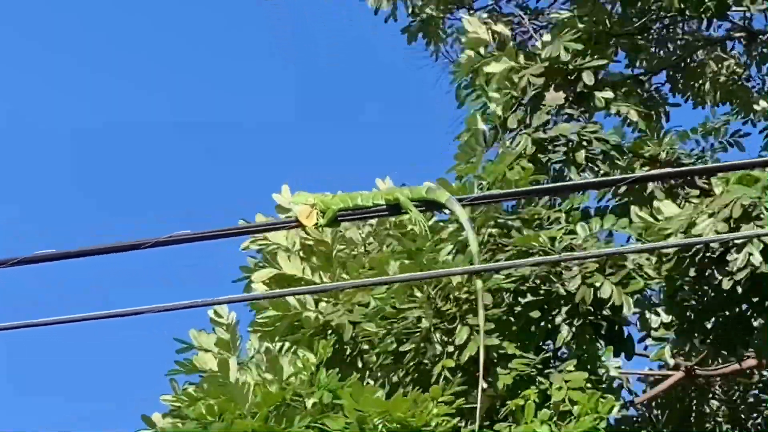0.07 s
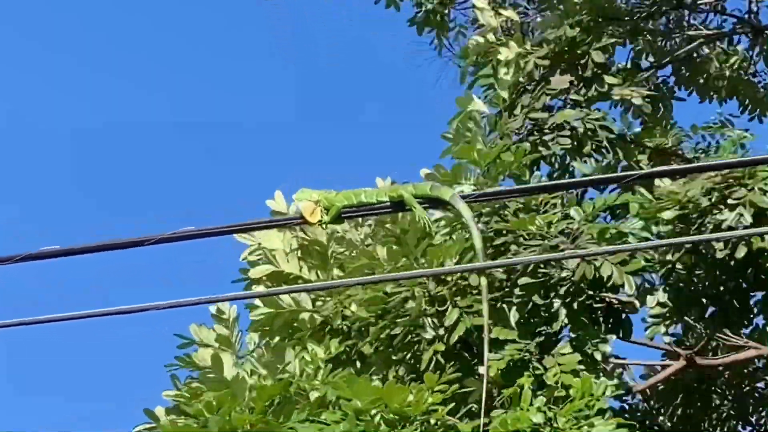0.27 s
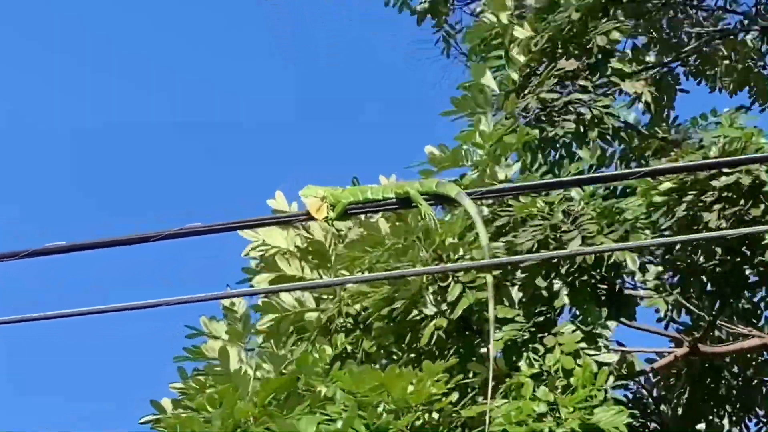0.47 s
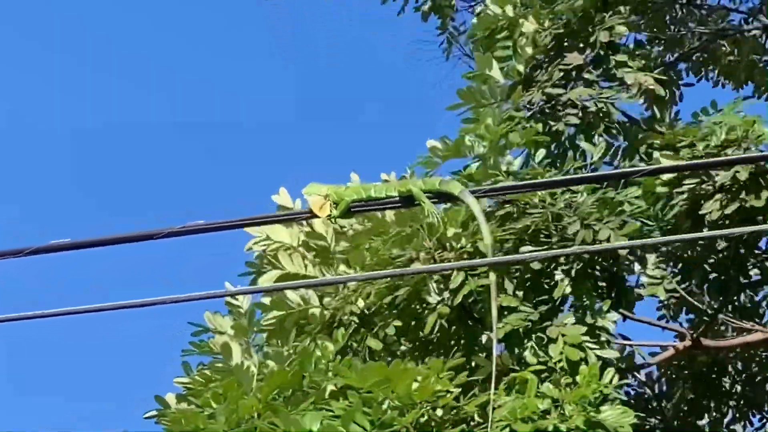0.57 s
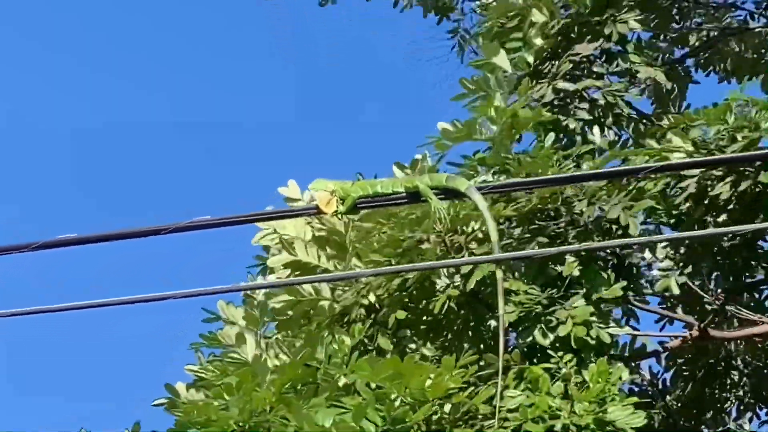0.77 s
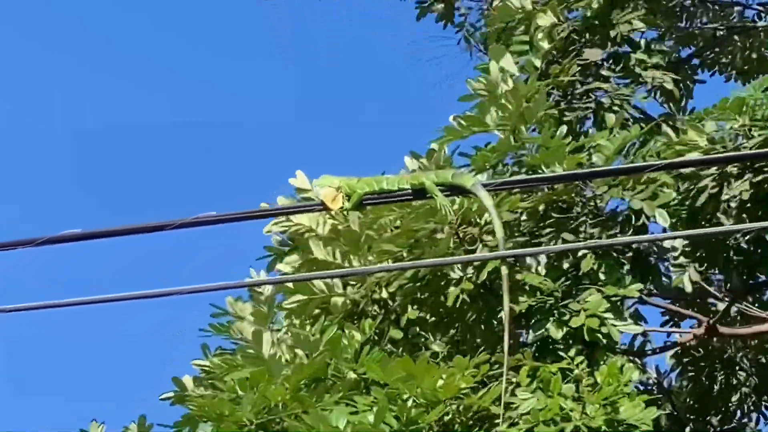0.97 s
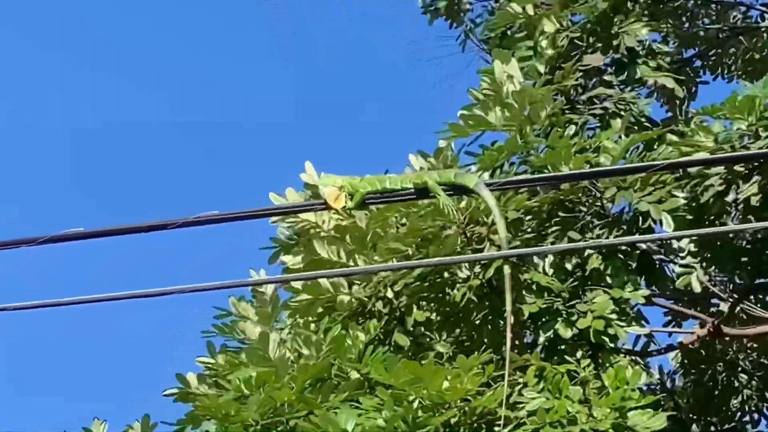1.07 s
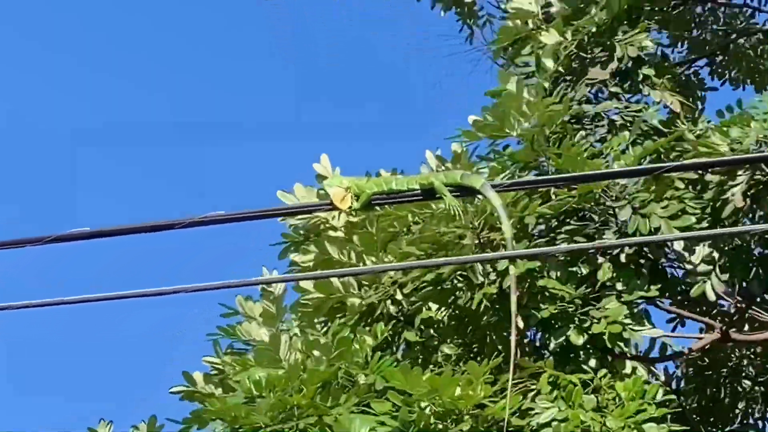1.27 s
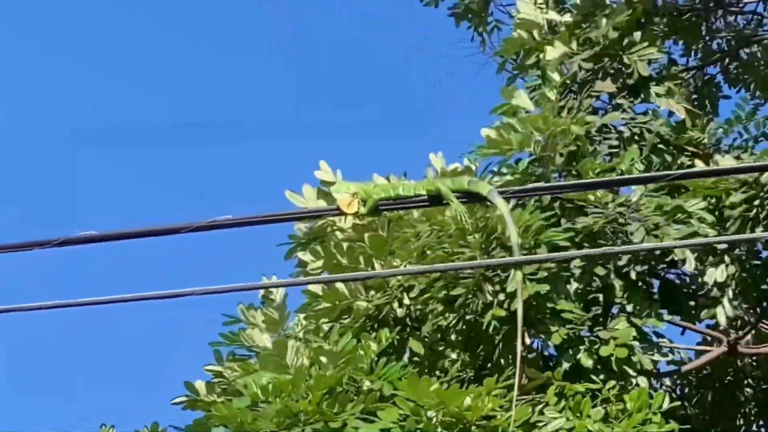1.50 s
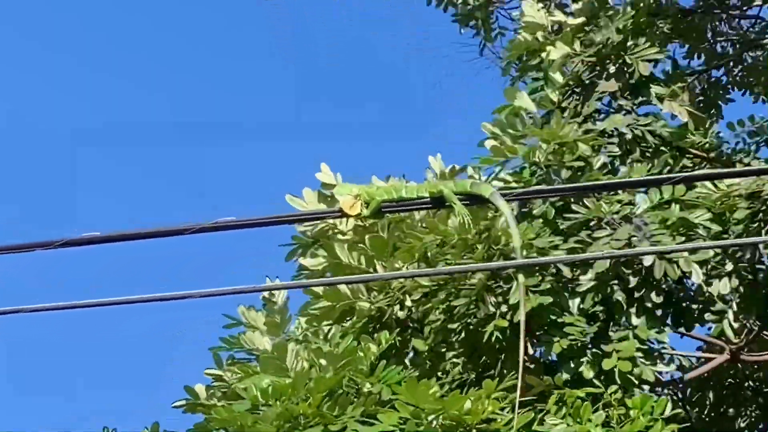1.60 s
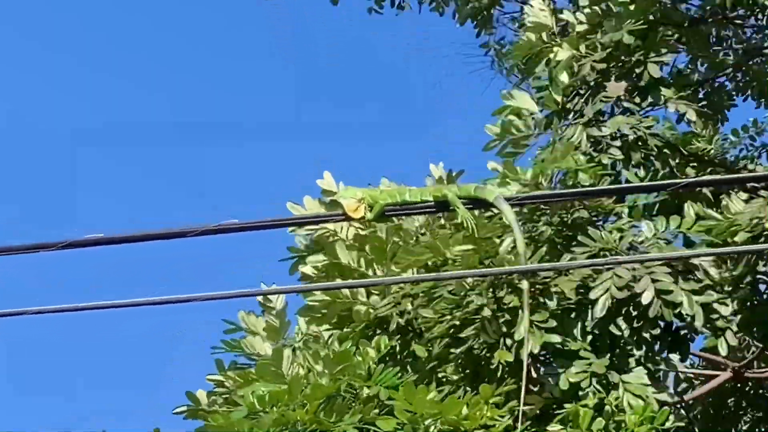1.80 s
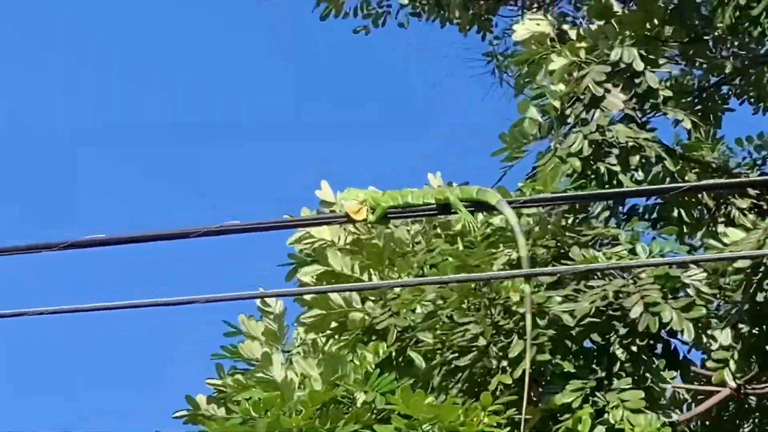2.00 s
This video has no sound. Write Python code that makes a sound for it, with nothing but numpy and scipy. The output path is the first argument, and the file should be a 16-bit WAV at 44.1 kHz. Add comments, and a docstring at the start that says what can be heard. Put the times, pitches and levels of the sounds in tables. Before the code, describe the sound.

Wind noise on a bare phone microphone outdoors. A hard, crackling blast hits in the first 0.1 seconds, followed by fluttering thumps until 0.3. Uneven low rumble and isolated soft thuds fill 0.5 to 1.3. A rough, tearing gust bursts at 1.4 to 1.5, a sharp pop lands at 1.55, and another gust at 1.8 before easing. Faint airy leaf rustle continues behind, slightly wide in stereo.

```python
"""Gusty wind on a phone microphone under a tree

Turbulent pressure buffets two ports: large eddies rumble, smaller ones flutter, both as shaped noise.
Tearing noise brightens the flutter as it strengthens. The hardest gusts shed rapid trains of vortices,
made as tones of wandering pitch; single eddies slap the ports as decaying swings with a sharp crack.
Behind them the air rushes and leaves rustle, as shaped noise and random ticks.
"""
import sys
import numpy as np
from scipy import signal
from scipy.fft import rfft, irfft
from scipy.io import wavfile
from scipy.ndimage import uniform_filter1d, minimum_filter1d

SR = 44100
rng = np.random.default_rng(int(sys.argv[2]) if len(sys.argv) > 2 else 0)


def bounce(signal):
    """Save signal as a 16-bit WAV file at the path given by the first command-line argument."""
    frames = np.transpose(np.atleast_2d(signal))
    limited = np.clip(frames, -1, 1)
    pcm = np.round(limited * 32767).astype(np.int16)
    wavfile.write(sys.argv[1], SR, pcm)


N = 90228
T = np.arange(N) / SR  # time in s


def undb(db):
    """Logarithmic level: decibels to amplitude gain."""
    return 10 ** (np.asarray(db) / 20)


def unit(x):
    """Normalisation: scale to rms 1."""
    return x / np.sqrt(np.mean(x ** 2))


def curve(rows):
    """Linear interpolation: join (s, value) rows by straight lines."""
    return np.interp(T, *np.array(rows).T)


def smooth_twice(x, size, mode="reflect"):
    """Moving average, applied twice for a triangular window."""
    return uniform_filter1d(uniform_filter1d(x, size, mode=mode), size, mode=mode)


def colour(x, points):
    """Spectral shaping: weight the spectrum of x by (Hz, dB) points, at rms 1."""
    hz, db = np.array(points).T
    bin_hz = np.maximum(np.arange(N // 2 + 1) * SR / N, 1)
    weight_db = np.interp(np.log(bin_hz), np.log(hz), db)
    return unit(irfft(rfft(x) * undb(weight_db), N))


def walk(rate):
    """Low-pass random process: a smooth wander of rms 1, averaged over 1/rate seconds."""
    return unit(smooth_twice(rng.standard_normal(N), int(SR / rate), mode="wrap"))


def pair(mid, side, likeness):
    """Partial coherence: left and right with a given correlation, from independent mid and side."""
    shared = np.sqrt((1 + likeness) / 2) * mid
    opposed = np.sqrt((1 - likeness) / 2) * side
    return shared + opposed * np.array([[1], [-1]])


def eddies(points, likeness, span_s):
    """Turbulent pressure: coherent noise on both ports, of even strength over spans longer than span_s."""
    pressure = colour(pair(*rng.standard_normal((2, N)), likeness), points)
    power = np.mean(abs(signal.hilbert(pressure)) ** 2, axis=0)
    return unit(pressure / np.sqrt(smooth_twice(power, int(span_s * SR))))


# Large slow eddies, before the trim RUMBLE_DB: [start_s, level_db]
RUMBLE_EDDIES = [(0.0, -27), (0.04, -19), (0.11, -18), (0.13, -19.5), (0.3, -20), (0.44, -38), (0.46, -42),
                 (0.5, -14), (0.6, -30), (0.62, -22), (0.69, -32.5), (0.79, -16), (0.84, -18.5),
                 (0.86, -29), (0.9, -21.5), (0.92, -40), (0.96, -25), (1.02, -35.5), (1.11, -33.5),
                 (1.16, -17), (1.3, -23.5), (1.35, -16.5), (1.38, -27), (1.57, -16.5), (1.6, -22.5),
                 (1.69, -21.5), (1.72, -13), (1.78, -29), (1.82, -21.5), (1.85, -24.5), (1.9, -25),
                 (1.93, -23.5), (2.05, -21.5)]
# Relative spectrum of the large eddies: [frequency_hz, density_db]
RUMBLE_SPECTRUM = [(15, -41), (30, -35), (45, -1.5), (65, -1.5), (100, -4), (150, -8), (220, -23.5),
                   (400, -34.5), (900, -81)]
RUMBLE_LIKENESS, RUMBLE_DB = 0.75, 0.5  # correlation between the ports; level trim in dB


def rumble():
    """Large-scale turbulence: slow eddies push on the ports as low-frequency pressure."""
    pressure = eddies(RUMBLE_SPECTRUM, RUMBLE_LIKENESS, span_s=0.051)
    return pressure * undb(curve(RUMBLE_EDDIES) + RUMBLE_DB)


# Small fast eddies, before lumps and the trim BUFFET_DB: [start_s, level_db]
BUFFET_EDDIES = [(0,-31),(.015,-26),(.03,-18.5),(.05,-13.5),(.085,-22),(.11,-38),(.14,-25),(.195,-34),(.218,-22.5),(.24,-38),(.26,-21.5),(.3,-32),(.33,-43),(.46,-49),(.53,-36.5),(.585,-22),(.61,-34),(.66,-50.5),(.7,-32.5),(.745,-54.5),(.78,-35.5),(.83,-27),(.9,-49),(.945,-29),(.97,-49.5),(1.125,-43),(1.16,-25.5),(1.205,-31.5),(1.27,-60),(1.325,-29.5),(1.37,-25.5),(1.4,-13),(1.48,-21),(1.52,-25),(1.555,-17.5),(1.59,-34.5),(1.615,-24.5),(1.635,-46),(1.665,-16),(1.69,-42),(1.715,-26),(1.745,-25.5),(1.8,-19),(1.835,-39),(1.855,-32.5),(1.89,-40),(1.92,-33.5),(1.96,-31.5),(1.98,-53),(2.005,-43),(2.05,-19.5)]
# Relative spectrum of the small eddies: [frequency_hz, density_db]
BUFFET_SPECTRUM = [(80, -13.5), (160, 0), (230, 1.5), (380, -4.5), (520, -8.5), (700, -19), (1000, -28),
                   (1600, -57), (3000, -83)]
# Relative spectrum of tearing air, heard here and in gusts and slaps: [frequency_hz, density_db]
TEAR_SPECTRUM = [(250, -8.5), (550, 4.5), (800, 4.5), (1200, 5), (1600, -8.5), (2200, -19.5), (2800, -47),
                 (4500, -52.5)]
BUFFET_LIKENESS, TEAR_LIKENESS = 0.89, 0.93  # correlation between the ports
BUFFET_DB = 1  # level trim of the flutter
LUMP_DB, LUMPS_PER_S = 3.5, 95  # eddies arrive in lumps: rms swing, rate of the wander
# tearing noise when the untrimmed flutter is at STRONG_DB; its dB per dB of flutter; its flicker
STRONG_DB, TEAR_DB, TEAR_GROWTH, TEAR_FLICKER_DB = -21, -52, 2.7, -2


def buffeting():
    """Small-scale turbulence: eddies flutter, and their tearing edge grows faster than they do."""
    level_db = curve(BUFFET_EDDIES) + LUMP_DB * walk(LUMPS_PER_S)
    flutter = eddies(BUFFET_SPECTRUM, BUFFET_LIKENESS, span_s=0.0083) * undb(level_db + BUFFET_DB)
    tear_db = TEAR_DB + TEAR_GROWTH * (level_db - STRONG_DB) + TEAR_FLICKER_DB * walk(130)
    return flutter + eddies(TEAR_SPECTRUM, TEAR_LIKENESS, span_s=0.013) * undb(tear_db)


# Hard gusts; levels before the swell, which is the dB rise from start to end; rate before wandering:
# [start_s, length_s, level_db, swell_db, vortex_rate_hz, irregularity (log rate), tear_level_db]
VORTEX_GUSTS = [(0.023, 0.0043, -14.5, -9, 330, 0.25, -20), (0.029, 0.011, -20, 14, 538.2, 0.43, -14.5),
                (0.214, 0.0097, -20.5, 8.5, 379.4, 0.29, -47), (0.257, 0.0079, -18, -2, 280, 0.28, -34),
                (1.391, 0.041, -19, -2, 235, .2, -33.5), (1.408, 0.016, -10, 3, 374.2, 0.22, -32),
                (1.429, .045, -10, -4.5, 399.5, .3, -24.5), (1.477, 0.049, -24, -16, 480, .35, -43),
                (1.781, 0.026, -11, 6.5, 450, .22, -31.5)]
GUST_ATTACK_S, GUST_DECAY_S = 0.0014, 0.0027
VORTEX_LIKENESS, VORTEX_SCATTER_DB = 0.64, 1.7  # correlation between the ports; spread of strength
SPIT_DB, SPIT_SCATTER_DB = 3, 4.5  # swing of the tearing noise within a cycle; its random swing


def gusts():
    """Vortex shedding: fast air sheds uneven vortices at the port rims, each with a spit of tearing noise."""
    out = np.zeros((2, N))
    tear = eddies(TEAR_SPECTRUM, TEAR_LIKENESS, span_s=0.009)
    for start, length, level_db, swell_db, hz, irregular, tear_db in VORTEX_GUSTS:
        along = np.clip((T - start) / length, 0, 1)
        attack = np.sin(np.clip((T - start) / GUST_ATTACK_S + .5, 0, 1) * np.pi / 2) ** 2
        release = np.exp(-np.maximum(T - start - length, 0) / GUST_DECAY_S)
        envelope = attack * release * undb(swell_db * (along - .5))

        shedding_hz = hz * np.exp(irregular * np.tanh(walk(512)))
        phase = 2 * np.pi * np.cumsum(shedding_hz) / SR
        mid = unit(np.sin(phase) * undb(VORTEX_SCATTER_DB * walk(350)))
        side = unit(np.cos(phase) * walk(150))
        vortices = pair(mid, side, VORTEX_LIKENESS)

        spit = unit(undb(SPIT_DB * np.sin(phase) + SPIT_SCATTER_DB * np.tanh(walk(210))))
        out += envelope * (undb(level_db) * vortices + undb(tear_db) * spit * tear)
    return out


# Single eddies that slap the ports; level is the swing's envelope peak, pitch its value at the onset,
# crack level the gain of its pulse: [start_s, level_db, pitch_hz, crack_level_db, crack_time_scale_ms]
EDDY_SLAPS = [(0.0331, -5, 496, 11, 0.31), (.039, -4, 740, -12, .25), (0.045, -8, 310, -35, .4),
              (.078, -5.5, 284, -28, .5), (.131, -15.5, 416, -16, 0.41), (.165, -15, 333, -29, 0.61),
              (.207, -11.5, 450, -29, 0.98), (.254, -14.5, 520, -11, 0.41), (.293, -25, 463, -24, 0.39),
              (.581, -15.5, 340, -43, 0.73), (.778, -12.5, 313, -49, 0.59), (.814, -13.5, 330, -26, .3),
              (.942, -16, 380, -47, .49), (1.149, -17, 377, -26, 0.73), (1.2, -18, 403, -20, 1),
              (1.319, -15, 391, -27, 0.43), (1.394, -11, 448, -4.5, 0.32), (1.413, -16, 422, -17.5, 0.39),
              (1.432, -13, 402, -5, 0.43), (1.444, -12, 531, -1, 0.38), (1.452, -10, 420, -1.5, 0.35),
              (1.471, -3.5, 381, -9, 0.28), (1.504, -15.5, 450, -13, 0.34), (1.538, -17.5, 301, -7.5, .4),
              (1.5498, -1.5, 580, 4.5, 0.25), (1.551, -5, 434, -20.5, 0.65), (1.606, -12, 324, -18, .47),
              (1.664, -11, 443, -16, 0.68), (1.701, -13.5, 346, -18.5, .17),
              (1.719, -23.5, 260, -8.5, 0.41), (1.729, -27, 276, -12.5, 0.41),
              (1.8031, -10, 440, -2.5, 0.34), (2.002, -13.5, 307, -49, .79)]
SLAP_CYCLES, SLAP_SAG = 1.25, 0.25  # decay scale in onset cycles; how quickly the swing slows
WAKE_DB, WAKE_RISE_S, WAKE_S = -18.5, .001, 0.0022  # wake gain relative to the crack; rise; decay


def slaps():
    """Impulsive pressure: a sharp crack, a swing that slows and dies, and a ragged turbulent wake."""
    out, wake = np.zeros(N), np.zeros(N)
    for start, level_db, hz, crack_db, crack_ms in EDDY_SLAPS:
        since = np.maximum(T - start, 0)
        cycles = since * hz
        age = cycles / SLAP_CYCLES
        slowing_phase = 2 * np.pi * np.log1p(SLAP_SAG * cycles) / SLAP_SAG
        swing = -np.sin(slowing_phase) * 2 * age * np.exp(1 - 2 * age)
        u = (T - start) * 1000 / crack_ms
        crack = u / (1 + u ** 2 / 4) ** 4  # negative, then positive, about the start
        out += undb(level_db) * swing + undb(crack_db) * crack
        wake_envelope = np.tanh(since / WAKE_RISE_S) ** 2 * np.exp(-since / WAKE_S)
        wake += undb(crack_db + WAKE_DB) * wake_envelope
    return out + wake * eddies(TEAR_SPECTRUM, TEAR_LIKENESS, span_s=0.0012)


LEE_HZ, LEE_DB, LEE_LEAK = 619, 0.13, 0.27  # low-pass corner, gain, share reaching the lee undulled


def ports(x):
    """Sheltering: the left port faces the wind; a low-pass makes the right slightly later and duller."""
    lee = signal.sosfilt(signal.butter(2, LEE_HZ, fs=SR, output="sos"), x[1])
    right = undb(LEE_DB) * ((1 - LEE_LEAK) * lee + LEE_LEAK * x[1])
    return np.array([x[0], right])


# Relative spectrum of air rushing through the crown: [frequency_hz, density_db]
CROWN_SPECTRUM = [(100, -17), (300, -13), (430, -3), (560, 9.5), (750, 0), (1080, 0.5), (1500, -6),
                  (2100, -8), (3000, -19.5), (6000, -23)]
# Relative spectrum of brushing and ticking leaves: [frequency_hz, density_db]
LEAF_SPECTRUM = [(800, 1), (2500, 3.5), (3500, 3), (5200, 0.5), (7200, 2.5), (11000, -0.5), (13000, -1),
                 (15500, -29.5)]
# Slow swell and ease of the leaf rustle: [start_s, level_change_db]
RUSTLE_SWAY = [(0, 0.5), (.4, -1), (.65, -0.5), (.82, -0.5), (1.05, -1.5), (1.6, -3), (1.77, -1.5),
               (2.05, -2.5)]
TREE_DB, LEAF_DB, LEAF_TICK_DB = -50, -57.5, -61.5  # before wander and sway
LEAF_TICKS_PER_S = 1600  # mean rate on each side


def tree():
    """Superposed random sources: air rushes softly through the crown; countless leaves brush and tick."""
    rush = colour(pair(*rng.standard_normal((2, N)), likeness=0.067), CROWN_SPECTRUM)
    rush *= undb(TREE_DB + 1.75 * walk(27))
    brush = colour(pair(*rng.standard_normal((2, N)), likeness=0.055), LEAF_SPECTRUM)
    brush *= undb(LEAF_DB + .5 * walk(5.2) + .5 * walk(40))
    touches = (rng.random((2, N)) < LEAF_TICKS_PER_S / SR) * rng.standard_normal((2, N))
    ticks = undb(LEAF_TICK_DB) * colour(touches, LEAF_SPECTRUM)
    return rush + (brush + ticks) * undb(curve(RUSTLE_SWAY))


def scene():
    """Linear superposition: wind on the ports in front of the rustling tree."""
    return rumble() + ports(buffeting() + gusts() + slaps()) + tree()


LIMIT, LIMITER_S, TOP_HZ = .91, .0015, 15700  # peak threshold; smoothing time; top of the band


def record(dry):
    """Peak limiting and band limiting: fast gain dips ease the highest peaks; a low-pass cuts the top."""
    size = int(LIMITER_S * SR)
    needed_gain = np.minimum(1, LIMIT / (abs(dry).max(axis=0) + 1e-9))
    held_gain = minimum_filter1d(needed_gain, 2 * size + 1)
    limited = dry * smooth_twice(held_gain, size)
    return signal.sosfilt(signal.ellip(8, .2, 70, TOP_HZ, fs=SR, output="sos"), limited)


dry = scene()
out = record(dry)
bounce(out)
```